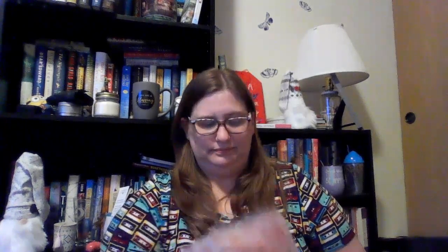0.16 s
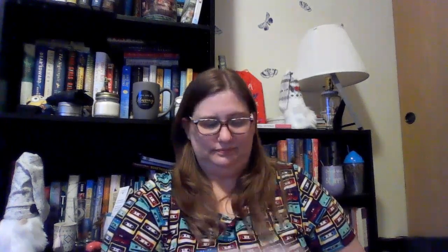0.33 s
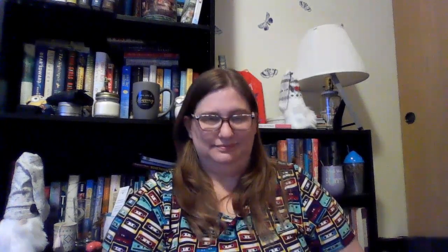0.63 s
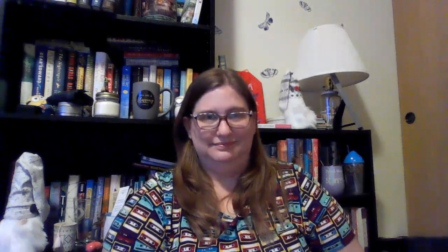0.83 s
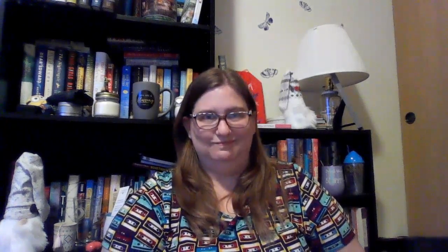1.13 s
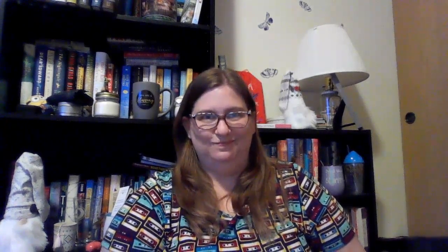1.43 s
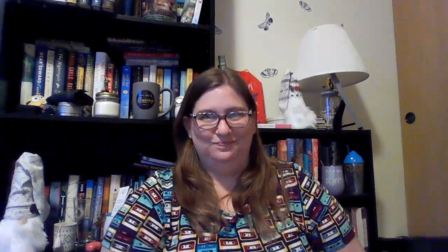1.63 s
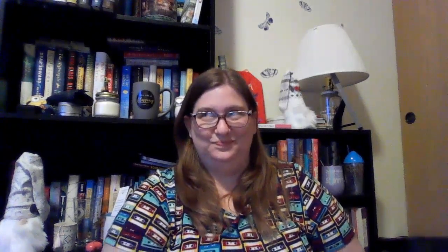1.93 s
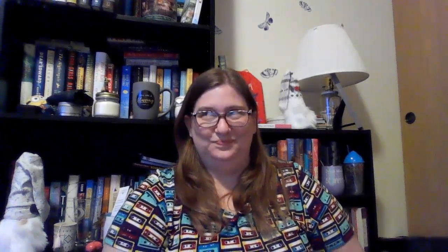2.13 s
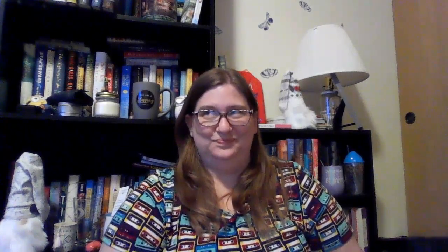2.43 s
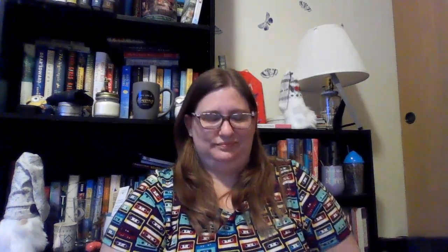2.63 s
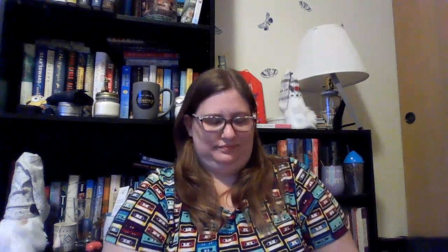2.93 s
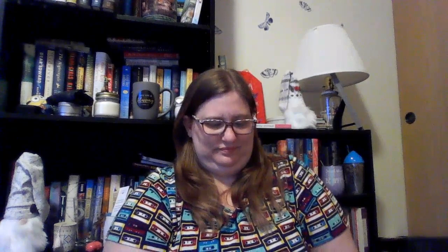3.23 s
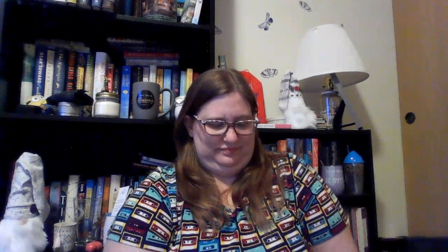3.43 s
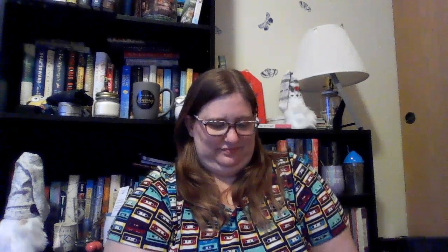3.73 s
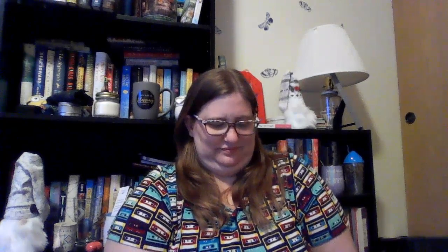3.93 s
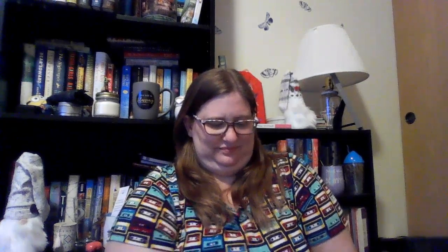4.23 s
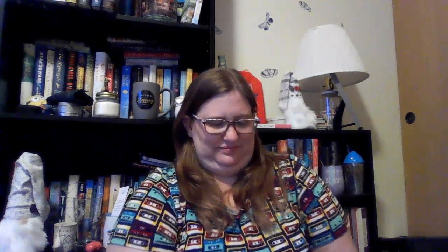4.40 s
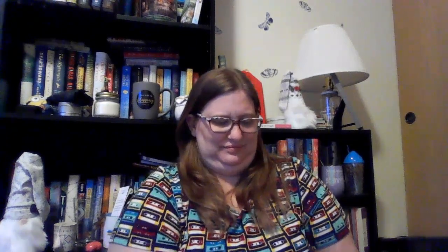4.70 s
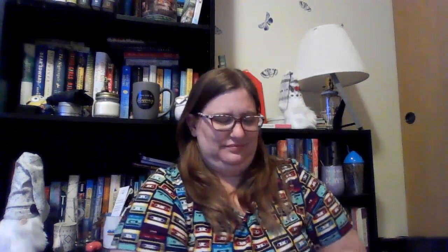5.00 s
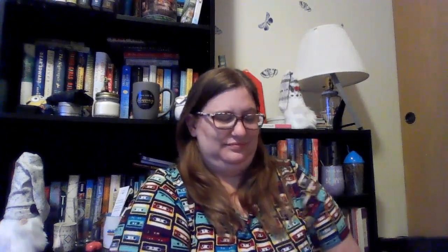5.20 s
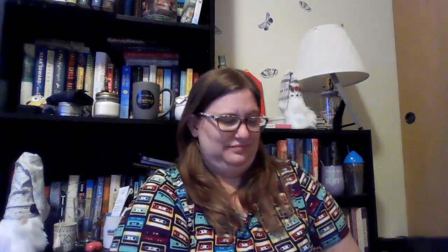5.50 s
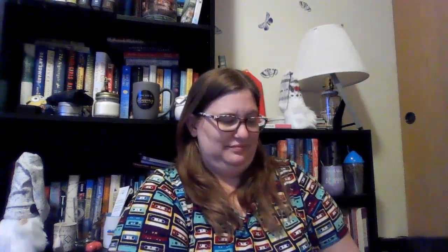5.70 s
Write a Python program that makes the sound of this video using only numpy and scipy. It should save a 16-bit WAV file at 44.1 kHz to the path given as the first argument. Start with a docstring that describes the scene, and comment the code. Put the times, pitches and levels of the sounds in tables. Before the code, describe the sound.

Hands unwrap a book at a desk in a small furnished room. The paper crinkles with small snaps, then rips sharply, and the parcel knocks on the desk top. After some quieter rustling comes a longer run of tearing, then a dull bump and a few faint crinkles. The sound is thin, picked up by a built-in microphone with a faint hiss.

```python
"""Wrapping paper crinkles and rips as hands unwrap a book at a desk.
Creases flip with small snaps; rips are dense bursts of breaking fibres that drum the sheet and fizz.
The parcel knocks the desk top and bounces; desk and parcel also hum with every pull.
A small furnished room answers, and a thin built-in microphone listens, adding a faint hiss."""
import sys
import numpy as np
from scipy import signal
from scipy.fft import rfft, irfft, next_fast_len
from scipy.io import wavfile
from scipy.ndimage import uniform_filter1d, map_coordinates

SR = 44100
rng = np.random.default_rng(int(sys.argv[2]) if len(sys.argv) > 2 else 0)


def log_audio(samples):
    """Write samples as a 16-bit WAV file to the path given in sys.argv[1]."""
    # one column per channel
    frames = np.atleast_2d(samples).T
    # limit to full scale, then quantise
    limited = np.clip(frames, -1, 1)
    pcm = np.round(limited * 32767).astype(np.int16)
    wavfile.write(sys.argv[1], SR, pcm)


N = 258117


def amp(db):
    """Gain of a level in dB."""
    return 10 ** (np.asarray(db) / 20)


def unit(x):
    """x at rms 1."""
    return x / np.sqrt(np.mean(x ** 2) + 1e-20)


def along(points, hz):
    """(freq_hz, value) points read on a log frequency axis."""
    freqs, values = np.transpose(points)
    return np.interp(np.log(hz + 1), np.log(freqs + 1), values)


def wobble(rate_hz):
    """A smooth random curve with rate_hz knots a second."""
    knots = rng.standard_normal(int(N * rate_hz / SR) + 4)
    return map_coordinates(knots, [np.arange(N) * rate_hz / SR])


def coloured(x, eq):
    """x through a minimum-phase EQ of energy 1."""
    size = 2 ** 12
    cepstrum = irfft(np.log(amp(along(eq, np.fft.rfftfreq(size, 1 / SR)))), size)
    cepstrum[1:size // 2] *= 2
    cepstrum[size // 2 + 1:] = 0
    response = irfft(np.exp(rfft(cepstrum)), size)
    return signal.fftconvolve(x, response / np.linalg.norm(response))[:N]


def breaking(spread_db, clump_db, slips_per_s, sparse):
    """Fibres break at random, most faint, a few strong; a slipping crease starts a fading shower."""
    breaks = amp(sparse * spread_db * rng.exponential(size=N)) * rng.standard_normal(N)
    slips = (rng.random(N) < slips_per_s / SR) * np.minimum(rng.exponential(size=N), 2.5)
    showers = signal.lfilter([1], [1, -np.exp(-1 / (0.0022 * SR))], slips)
    return unit(breaks * (1 + sparse * showers) * amp(clump_db * wobble(150)))


# Tone of the noise floor: freq_hz, level_db
HISS_EQ = [(20, -13), (50, -15.5), (80, -3.5), (125, 2.5), (200, 0.5), (400, 4.5), (750, -11), (1200, -5.5),
           (3000, -14.5), (8000, -9), (13000, -8.5), (16500, -6)]


def microphone_hiss():
    """The microphone's own faint, steady noise."""
    return amp(-75.5) * coloured(rng.standard_normal(N), HISS_EQ)


# Reverb time of the small room: freq_hz, t60_s
ROOM_DECAY = [(150, 0.24), (1000, 0.13), (5000, 0.069), (15000, 0.054)]


def room(send):
    """A short reverb whose highs die first."""
    hz, t, noise = signal.stft(rng.standard_normal(SR // 2), SR, nperseg=256)
    tail = signal.istft(noise * amp(-60 * t / along(ROOM_DECAY, hz)[:, None]), SR, nperseg=256)[1]
    predelayed = np.pad(send, (300, 0))
    return signal.fftconvolve(predelayed, tail / np.linalg.norm(tail))[:N]


# Body tones of the desk top and the hollow parcel: freq_hz, level_db
DESK_EQ = [(60, -40), (110, -12), (150, -0.5), (200, -0.5), (270, -6.5), (340, -4), (480, -41)]
PARCEL_EQ = [(220, -31), (300, -7.5), (360, -3.5), (480, -3.5), (600, -7.5), (800, -17.5), (1100, -35)]


def desk_hum(desk_db, parcel_db):
    """Uneven pulls shake the desk top and the hollow of the parcel."""
    shake = breaking(spread_db=1, clump_db=3, slips_per_s=47, sparse=0.7)
    desk = coloured(amp(desk_db + 4.5) * shake, DESK_EQ)
    return desk + coloured(amp(parcel_db - 1.5) * shake, PARCEL_EQ)


# Resonances of the desk top: pitch_hz, level_db, t60_s
DESK_MODES = [(167, 1.5, 0.035), (197.9, 4, 0.059), (250.8, -9, .2), (277.7, -17.5, 0.35), (337, 5, 0.053),
              (404, -2, 0.067), (500.4, -20.5, .06), (710, -16, 0.03), (1010, -3, 0.044)]
# The parcel lands and bounces: start_s, level_db, hardness_hz
KNOCK_HITS = [(0.403, -51.5, 285), (1.184, -55.5, 500), (1.241, -52, 298), (1.77, -45.5, 700),
              (1.8325, -15.5, 730), (1.866, -32, 400), (1.895, -54, 500), (2.711, -58, 500),
              (4.731, -35, 282), (4.817, -22, 242), (4.849, -43, 296), (4.884, -39, 297)]


def knocks():
    """Each knock rings the desk modes; a soft contact has a slow attack and weak upper modes."""
    out, t = np.zeros(N + SR), np.arange(SR // 2) / SR
    for start_s, level_db, hardness_hz in KNOCK_HITS:
        ring = 0
        for hz, mode_db, t60_s in DESK_MODES:
            decay = amp(mode_db + rng.normal() - 60 * t / t60_s)
            ring += decay / (1 + (hz / hardness_hz) ** 3) * np.sin(2 * np.pi * hz * t)
        attack = (1 - np.exp(-t * hardness_hz / 0.8)) ** 2
        out[round(start_s * SR):][:len(t)] += amp(level_db) * ring * attack
    return out[:N]


# Handling automation, in three stretches: time_s, fibre_db, sheet_db, fizz_db, desk_db, parcel_db
HANDLING_LEVELS = [
    [(0.0, -75, -83, -79, -81, -75), (0.132, -72.5, -72, -71, -94, -90), (0.4, -61.5, -71, -64, -75, -78),
     (0.614, -59.5, -61, -61, -72.5, -62), (1.046, -57.5, -61.5, -62.5, -72, -64.5),
     (1.408, -59, -64, -63, -64, -64), (1.6, -65.5, -70.5, -69, -73.5, -65)],
    [(1.76, -54, -59, -55.5, -64, -67), (1.858, -48, -43, -48, -63.5, -59.5),
     (2.06, -64, -64, -64, -70.5, -75), (2.518, -71.5, -70, -74, -80, -77),
     (3.032, -66, -72, -62, -84, -78), (3.336, -75, -81.5, -78, -90.5, -86),
     (3.72, -74, -72, -69.5, -85.5, -83.5)],
    [(4.34, -59, -51.5, -58.5, -67, -61), (4.486, -60.5, -71, -69, -70, -77),
     (4.668, -70.5, -76, -73, -65.5, -80), (5.27, -80, -78, -83, -75, -76.5),
     (5.46, -68.5, -67, -64.5, -81.5, -73.5), (5.67, -71.5, -77, -73.5, -85, -90),
     (5.853, -95, -95, -91, -90.5, -95)],
]


def handling_power():
    """Hands keep the paper rustling: power envelopes for fibre, sheet, fizz, desk and parcel."""
    times_s, *faders = np.vstack(HANDLING_LEVELS).T
    return amp([np.interp(np.arange(N) / SR, times_s, db) for db in faders]) ** 2


# Snapping creases: start_s, level_db, sheet_db, panel_hz, parcel_db, swell_db
# Sheet, parcel and swell are trims on level_db.
CREASE_SNAPS = [(0.0836, -41.5, -16.5, 2560, -36, -28), (0.1755, -31.5, -20, 2600, -50, -22),
                (0.2867, -37.5, -28, 2430, -34, -20.5), (0.4017, -35, -15.5, 1470, -18, -20.5),
                (0.4357, -43.5, -12.5, 2620, -19, -14), (0.4857, -32.5, -14.5, 2570, -21, -17.5),
                (0.5734, -46.5, 2, 2530, -20, -19), (0.617, -30.5, -11, 2590, -18.5, -21),
                (0.7411, -35.5, -8, 1560, -18, -16.5), (0.754, -29.5, -11, 1640, -16.5, -21.5),
                (0.852, -45.5, -7, 1340, -13, -33), (0.8757, -39.5, -8, 2060, -14, -15),
                (1.0084, -33.5, -5.5, 2190, -16.5, -17.5), (1.0861, -44, -6, 2180, -2, -24.5),
                (1.0984, -29, -4, 2160, -27, -24.5), (1.1472, -33, -12.5, 2350, -24, -23),
                (1.1848, -32.5, -7, 1190, -14, -22.5), (1.2496, -49, -4, 1360, 2, -31.5),
                (1.375, -49.5, 1, 2300, -1, -18), (1.5963, -32.5, -12, 1200, -31, -27),
                (1.6942, -19, -15.5, 1333, -28, -26), (1.7093, -18.5, -12, 1410, -21, -29),
                (1.7688, -36.5, 3, 1190, -5, -28.5), (1.8314, -31.5, -1, 1010, 9, -27.5),
                (1.872, -43, -8, 2060, -2, -20.5), (1.9016, -29, -5, 1410, -21, -29.5),
                (1.9144, -27.5, -10.5, 970, -34, -27.5), (2.0135, -28, -9.5, 1030, -20, -16),
                (2.217, -47, -9, 1095, -23, -26.5), (2.5626, -48.5, -26, 1410, -15, -18.5),
                (2.7926, -44, -12, 1850, -25, -35), (2.824, -41, -34, 1160, -32, -20),
                (2.8899, -47, -23, 1090, -33, -27), (2.9518, -40, -17.5, 1180, -31.5, -36),
                (3.1178, -38.5, -13, 1445, -33.5, -19), (3.2188, -46.5, -13.5, 1073, -12.5, -22),
                (3.3267, -46.5, -32.5, 1250, -31, -36), (3.4102, -41, -17.5, 1140, -24, -27.5),
                (3.495, -42.5, -18, 1080, -32, -29.5), (3.5486, -47, -13.5, 2440, -20, -27),
                (3.6539, -51, -16, 1125, -30, -30), (3.7155, -41.5, -29, 1620, -27, -39),
                (3.7308, -37, -1, 1050, -22, -48), (3.7412, -29, -8.5, 2730, -32.5, -50),
                (3.7584, -30, -7.5, 1140, -43, -28), (3.7747, -29, -11, 1190, -39, -25.5),
                (3.7924, -33.5, -9, 1430, -34, -28), (3.8114, -26.5, -13, 1590, -35.5, -24),
                (3.8364, -32.5, -19.5, 1860, -33.5, -20.5), (3.8473, -31.5, -9, 1180, -39, -28),
                (3.8671, -31.5, -15, 1130, -25, -34.5), (3.8933, -41.5, -4, 1160, -39, -24),
                (3.916, -39, -19, 1270, -35, -27), (3.9673, -40.5, -11, 1450, -39, -31.5),
                (4.0039, -22, -18, 2280, -50, -21.5), (4.0423, -26, -13, 1440, -43, -20.5),
                (4.148, -28.5, -22, 2440, -43, -18), (4.2261, -28, 3.5, 1370, -16, -22.5),
                (4.2743, -33, 2.5, 1030, -7, -19.5), (4.4434, -47, 6, 1470, -25, -22),
                (5.1835, -55, -11.5, 1140, -30, -34), (5.2715, -47, -14, 1160, -11, -17.5),
                (5.37, -43.5, -12, 2300, -30, -20.5), (5.7076, -51, -15.5, 2160, -42, -29),
                (5.7877, -56, -27, 1263, -25, -28), (5.803, -53, -26, 2360, -25.5, -27)]


def snaps():
    """A crease flips: one sharp break and a few ms of smaller ones; the panel beside it rings briefly."""
    crackle_t60_s, panel_t60_s = 0.009, 0.021
    t = np.arange(SR // 20) / SR
    layers, panels = np.zeros((4, N + len(t))), np.zeros(N + len(t))
    for start_s, level_db, sheet_db, panel_hz, parcel_db, _ in CREASE_SNAPS:
        burst = 0.29 * rng.standard_normal(len(t)) * amp(-60 * t / crackle_t60_s)
        burst[0] = 0.8 * np.sign(burst[0])  # the first sharp break
        fizz_db = -4.5 - 0.3 * sheet_db  # more drumming of the sheet, less fizz
        trims_db = np.array([sheet_db + 6.5, 0.1, fizz_db, parcel_db + 14.5])
        here = round(start_s * SR) + np.arange(len(t))
        layers[:, here] += np.outer(amp(level_db + trims_db), burst)
        ring = amp(-60 * t / panel_t60_s) * np.sin(2 * np.pi * panel_hz * t)
        panels[here] += amp(level_db + sheet_db - 2) * ring
    return panels[:N] + sum(map(coloured, layers, (SHEET_EQ, FIBRE_EQ, FIZZ_EQ, PARCEL_EQ)))


def swell_power():
    """Crackle swells and fades around each snap: power for the same five layers as the handling."""
    attack_db_per_s, release_db_per_s = 610, 302.5
    power = np.zeros((5, N))
    offsets = np.arange(-SR // 10, SR // 5)
    swell = amp(np.minimum(attack_db_per_s * offsets, -release_db_per_s * offsets) / SR)
    for start_s, level_db, sheet_db, _, parcel_db, swell_db in CREASE_SNAPS:
        here = np.clip(round(start_s * SR) + offsets, 0, N - 1)
        trims_db = np.array([0, sheet_db + 7.5, -5.5, -28.5, parcel_db + 7.5])
        power[:, here] += np.outer(amp(level_db + swell_db + trims_db), swell) ** 2
    return power


# Rips and slides: start_s, attack_s, hold_s, release_db_per_s, level_db,
# then trims on that fibre level: sheet_db, fizz_db, desk_db, parcel_db
PAPER_RIPS = [(0, 0.00045, 0.004, 213, -60.5, -11.5, -2, -20, -15),
              (0.089, 0.082, .01, 113, -54, -14, -0.5, -28, -13),
              (1.595, .006, .02, 100.5, -56, -3.5, -4, -13.5, 0),
              (1.626, 0.0035, 0.073, 318.5, -34, -7.5, -3.5, -21.5, -20.5),
              (1.64, 0.045, 0.0098, 399.5, -36, 6, 2, -9.5, -2),
              (1.813, 0.0083, 0.13, 119.5, -49.5, -9.5, -7, -17, -11),
              (2.202, 0.05, 0.047, 71.5, -60.5, -5, -1, -26, -29),
              (2.694, 0.075, 0.033, 27, -67, -3, 2.5, -15, -9.5),
              (3.7262, 0.0022, 0.038, 77.5, -44, -6.5, -2, -42, -24),
              (3.892, 0.014, 0.013, 350, -47, -9.5, -0.5, -36, -30),
              (3.966, 0.06, 0.038, 167.5, -35.5, -8.5, -4, -32, -26),
              (4.145, 0.052, 0.014, 195.5, -32, -5.5, -6.5, -14, -28),
              (4.213, .04, 0.022, 353, -39, 2, -3, -2.5, -5.5),
              (4.431, 0.026, .15, 153, -60, -3.5, -0.5, -9.5, -3.5),
              (4.791, 0.058, .11, 251, -66, -2.5, -0.5, 0.5, -2),
              (5.247, 0.068, 0.046, 41.5, -63.5, -7, -3.5, -7, -16)]


def rip_power():
    """Each rip climbs, holds and dies away: power for the same five layers as the handling."""
    climb_db = 20.5
    power, t = np.zeros((5, N)), np.arange(N) / SR
    for start_s, attack_s, hold_s, release_db_per_s, level_db, *trims_db in PAPER_RIPS:
        age_s = t - start_s
        attack_db = climb_db * np.minimum(age_s / attack_s - 1, 0)
        release_db = -release_db_per_s * (age_s - attack_s - hold_s)
        envelope = amp(level_db + np.minimum(attack_db, release_db)) * (age_s > 0)
        power += np.outer(amp([0, *trims_db]), envelope) ** 2
    return power


def patchy(x, depth_db):
    """Random frequency bands briefly swell and fade, giving the crackle a faintly pitched, patchy tone."""
    bands = signal.stft(x, nperseg=256)[2]
    patches = uniform_filter1d(rng.standard_normal(bands.shape), size=3, axis=0)
    patches = uniform_filter1d(patches, size=5, axis=1)
    return unit(signal.istft(bands * amp(depth_db * unit(patches)), nperseg=256)[1][:N])


# Midrange drumming of the sheet, bright fibre crackle and airy fizz: freq_hz, level_db
SHEET_EQ = [(600, -27), (850, -9), (1100, -0.5), (1500, -3), (1900, -4.5), (2300, -2), (2900, -11.5),
            (4000, -34.5)]
FIBRE_EQ = [(1500, -32), (2800, -5.5), (4000, -2.5), (5500, -4), (7500, -5), (10000, -3), (14000, -30.5)]
FIZZ_EQ = [(5000, -17), (8000, -12), (10000, 2.5), (13000, 0), (15000, -3.5), (16500, -7)]


def paper(fibre_db, sheet_db, fizz_db):
    """One stream of breaks excites sheet, fibres and fine fizz; each also has breaks of its own."""
    sparse = np.clip((-25 - fibre_db) / 25, 0.3, 1)  # in a hard rip the many breaks merge
    shared = breaking(spread_db=2, clump_db=1, slips_per_s=43, sparse=sparse)
    out = 0
    for eq, level_db, own_gain, depth_db in (
            (SHEET_EQ, sheet_db, 0.9, 2.2), (FIBRE_EQ, fibre_db, 0.6, 1.8), (FIZZ_EQ, fizz_db, 0.6, 1.2)):
        own = breaking(spread_db=3, clump_db=4, slips_per_s=32, sparse=sparse)
        crackle = patchy(shared + own_gain * own, depth_db)
        out += coloured(amp(level_db + 2.5 - 3.2 * sparse) * crackle, eq)
    return out


def scene():
    """Paper and knocks feed the room; the desk hum stays dry."""
    power = handling_power() + rip_power() + swell_power()
    fibre_db, sheet_db, fizz_db, desk_db, parcel_db = 10 * np.log10(power)
    wrapping = paper(fibre_db, sheet_db, fizz_db) + snaps()
    wood = knocks()
    reverb_send = amp(-11.5) * wrapping + amp(-10.5) * wood
    return (wrapping + wood + desk_hum(desk_db, parcel_db) + room(reverb_send))[None]


def record(dry):
    """The thin microphone keeps only a trace of deep bass, adds hiss and cuts the very top."""
    low_cut_hz, high_cut_hz, bass_leak_db = 135, 15830, -23
    size = next_fast_len(N + SR)
    hz = np.fft.rfftfreq(size, 1 / SR)
    s = 1j * hz / low_cut_hz
    low_cut = (s * s / (s * s + 1.565 * s + 1)) ** 4 + amp(bass_leak_db)
    spectrum = rfft(dry, size) * low_cut + rfft(microphone_hiss(), size)
    return irfft(spectrum * (hz < high_cut_hz), size)[:, :N]


dry = scene()
out = record(dry)
log_audio(out)
```